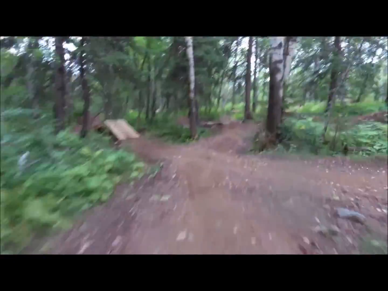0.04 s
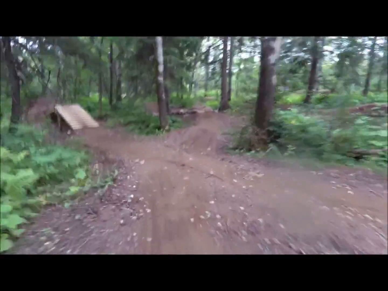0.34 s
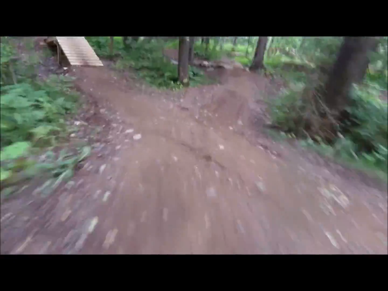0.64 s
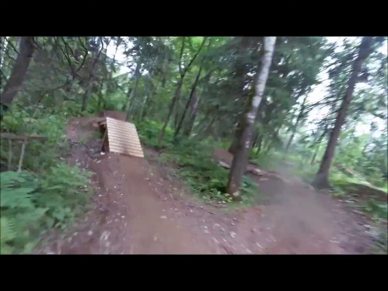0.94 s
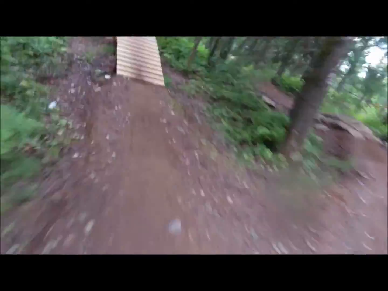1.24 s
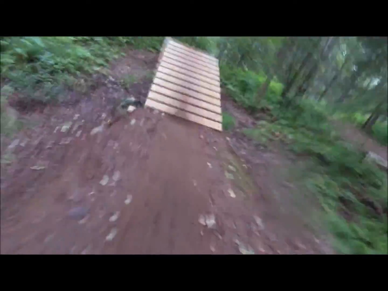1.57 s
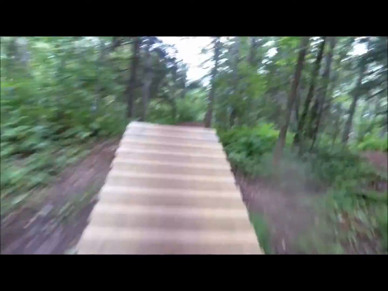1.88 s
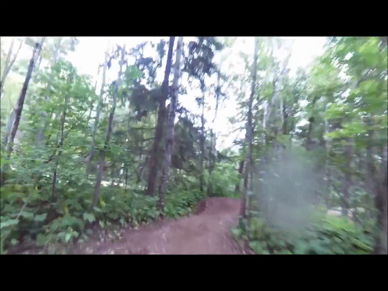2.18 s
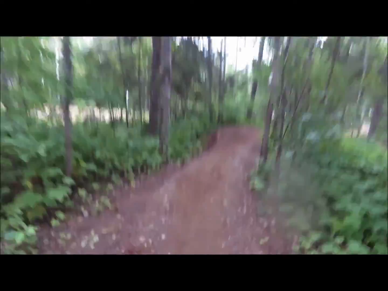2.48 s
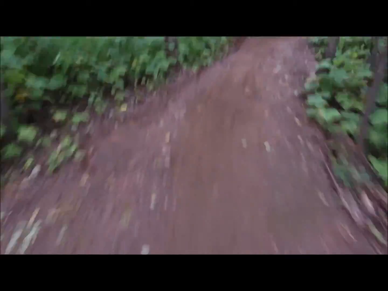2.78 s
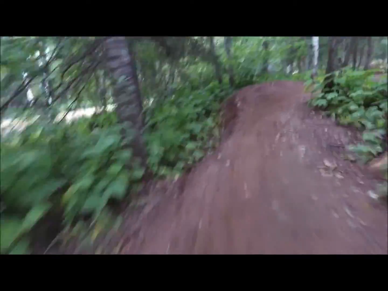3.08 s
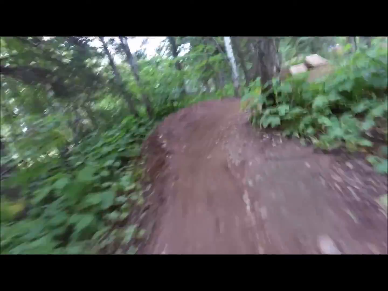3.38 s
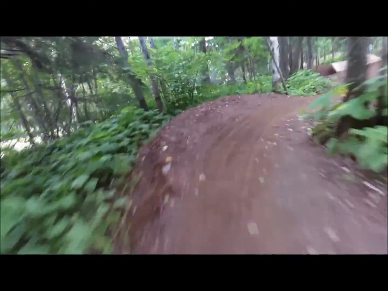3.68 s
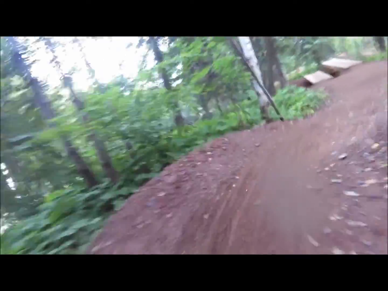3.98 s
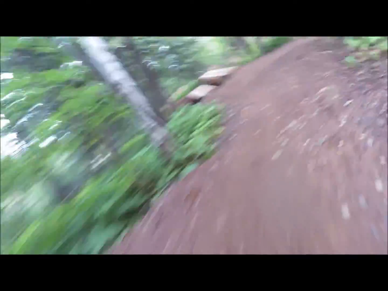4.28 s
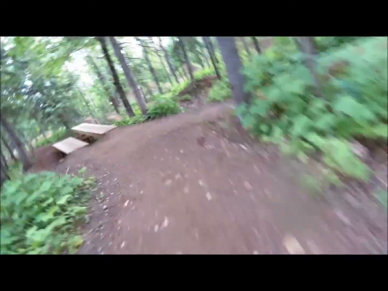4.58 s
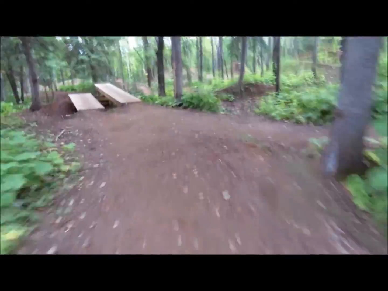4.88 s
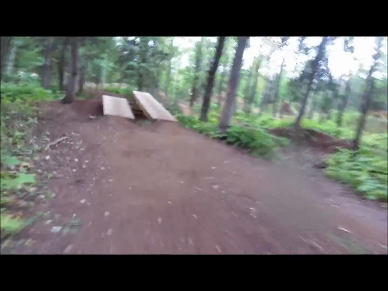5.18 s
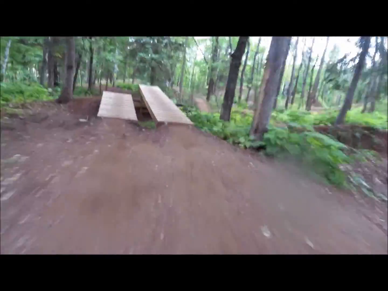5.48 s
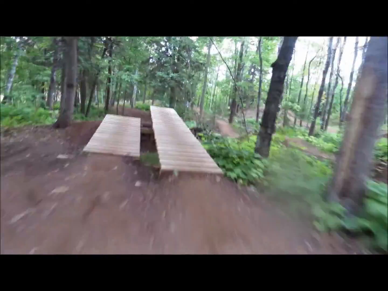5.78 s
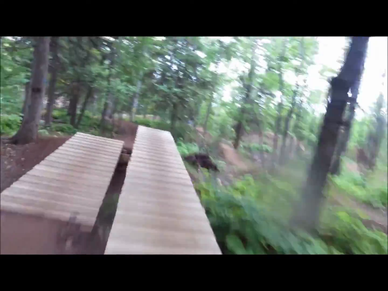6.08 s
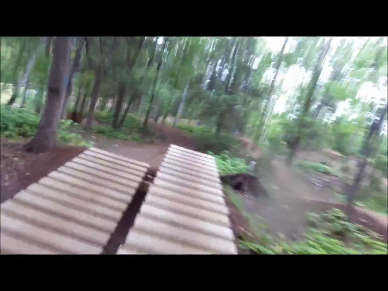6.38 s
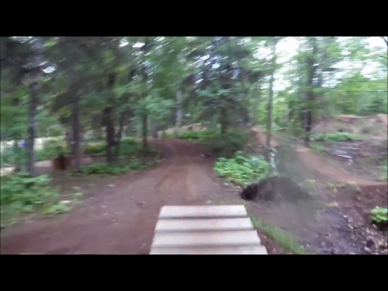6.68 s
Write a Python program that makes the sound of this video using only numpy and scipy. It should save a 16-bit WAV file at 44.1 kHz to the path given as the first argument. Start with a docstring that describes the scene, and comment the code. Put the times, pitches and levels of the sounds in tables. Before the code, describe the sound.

A mountain bike rolls along a dirt forest trail, heard close from the rider's camera. Low wind rumble and a hollow hum run under tyre hiss, crackling grit, irregular thuds and chain clacks. The wheels drum briefly over a wooden ramp, the rattling eases in the air, and the bike lands with a loud, slightly distorted clatter. Bumpy riding continues, with another burst of knocks on wooden boards near the end.

```python
"""On a dirt trail, a mountain bike jumps off a wooden ramp and lands, heard from the rider's camera.
Bumps excite the camera case by impact and briefly overload the microphone; landings shake the mount
and clip the recorder. Chain and pebbles ring the frame's resonances. Rolling contact makes the tyres
hiss, with more chatter and grit on rough ground. Turbulent wind rumbles round the case and hums in
its cavity."""
import sys
import numpy as np
from scipy import signal
from scipy.fft import rfft, irfft, next_fast_len
from scipy.io import wavfile
from scipy.ndimage import map_coordinates

SR = 44100
rng = np.random.default_rng(int(sys.argv[2]) if len(sys.argv) > 2 else 0)


def store_pcm(level_fs):
    """Save levels as 16-bit WAV."""
    pcm = np.round(np.clip(level_fs, -1, 1) * 32767).astype(np.int16)
    wavfile.write(sys.argv[1], SR, np.atleast_2d(pcm).T)


N = 301644


# the hardest bumps, in relative levels: start_s, thud_db, knock_db, edge_db
BUMPS = [(.2231, -8.5, -4.5, -28), (.2795, -5, -1.5, -20.5), (.3175, 3, -9, -50), (.7641, -1.5, -9, -29.5),
         (.9151, 0, -10, -41.5), (.9445, -10, -8.5, -48.5), (.978, -4, -6, -43), (1.2283, -1, 2, -17.5),
         (1.2463, 12.5, 1.5, -17.5), (1.2711, 4, -5.5, -16.5), (1.3487, -1, -27, -20),
         (1.3935, 0.5, -7, -39), (1.4238, -6.5, -7.5, -38.5), (1.5179, 7, -3, -37.5),
         (1.5433, 7, -9, -29.5), (1.5565, 2, -8.5, -32), (1.6353, 2, -11, -36), (1.6662, 7.5, -16, -35.5),
         (1.6945, 0, -10, -24.5), (1.7038, -4, 2.5, -36.5), (1.7421, -4, -2.5, -32), (1.7853, 6, -5, -34),
         (2.0792, -9, 2.5, -27.5), (2.1519, 4.5, -16, -43), (2.2018, -1, -8.5, -56),
         (2.2527, 5, -9.5, -37.5), (2.283, 5.5, -12, -28.5), (2.8628, 1.5, -2, -26),
         (2.8751, 11, 3.5, -22.5), (2.9502, 12, -0.5, -24), (2.9898, 6.5, -7, -24.5),
         (3.0483, 2, -7.5, -27.5), (3.0982, -11, -2, -28.5), (3.1506, 8, -16, -35.5),
         (3.1934, 0.5, -14.5, -33), (3.5397, 11.5, -9.5, -25.5), (3.5549, -1.5, -3.5, -49),
         (3.6555, -7.5, 0.5, -27), (3.6672, 7.5, -10, -25.5), (3.7171, -12, -4.5, -37),
         (3.7299, 5, -2, -29.5), (3.8454, 4.5, .5, -36), (3.9951, -10.5, -5.5, -28.5), (4.0538, 0, -5, -49),
         (4.1015, 1, 0.5, -34), (4.1394, 5.5, -1, -25), (4.1957, 7, -16.5, -34), (4.2567, 0.5, -1.5, -33),
         (4.3193, 1, -12, -44.5), (4.4174, -9.5, -5.5, -34), (4.459, -0.5, -10.5, -36),
         (4.5652, 0, -0.5, -38), (4.5801, -3, -6.5, -44), (4.9349, -6.5, -8, -52), (4.9573, -8.5, -8, -28),
         (4.969, -6, -6.5, -42), (4.9847, -1, -3.5, -28), (5.0147, 6, -4.5, -39), (5.0885, 2.5, -8, -35.5),
         (5.1109, 2.5, -0.5, -26), (5.1509, -9, -5.5, -35.5), (5.1761, 8, -15, -27), (5.2126, 4, -17, -30),
         (5.2285, -4, -13, -25), (5.2509, -1.5, -9, -35.5), (5.2719, -11, -5.5, -55.5),
         (5.3881, 6.5, -13, -34.5), (5.5064, -5.5, -3, -33), (5.53, 3.5, -2, -47.5),
         (5.6462, 8, -7.5, -28.5), (5.6946, -0.5, -10.5, -61), (5.7233, -3.5, -6.5, -58),
         (6.0424, -16, -2.5, -36.5), (6.0852, -3, -4.5, -40.5), (6.2658, 5, -4.5, -16),
         (6.2987, 4, -1, -28), (6.3159, 0.5, -10, -26), (6.3574, 9, -12, -29), (6.371, 5.5, -8, -30),
         (6.457, 1, -7, -28), (6.4823, 9, -24, -31.5), (6.5242, 1, -15, -31), (6.6255, -4.5, -10, -42),
         (6.7212, -2, -8, -43.5), (6.7995, -4.5, -2, -28)]
# frequency response of the struck case: frequency_hz, level_db
CASE_RESPONSE = [(20, -36), (65, 1.5), (150, 4.5), (300, 5.5), (450, 4.5), (700, -1.5), (1000, 0.5),
                 (1400, -2.5), (2800, 0), (4000, -9.5), (5500, -30), (8000, -35.5), (15000, -44.5)]
def case_knocks(rebound_hz=340, uneven_db=5.0, modes=22, max_blows=400):
    """Impact excitation: each bump throws the case against its mount, in alternating directions."""
    track, mode_hz = np.zeros(N), np.geomspace(600, 9000, modes)
    mode_scatter = rng.standard_normal((max_blows, modes))
    rebound_scatter = rng.standard_normal(max_blows)
    for k, (s, thud_db, knock_db, edge_db) in enumerate(BUMPS + ramp_slats() + small_bumps()):
        blow = [(150, thud_db - 3.0), (700, knock_db), (2800, edge_db)]
        # every blow lands elsewhere and rings other resonances of the bike
        ringing = np.c_[mode_hz, uneven_db * mode_scatter[k] * signal.windows.tukey(modes, .2)]
        colour = lambda hz: along(CASE_RESPONSE, hz) + along(blow, hz) + along(ringing, hz) + 33
        add(track, s, (-1) ** k * pulse(colour, rebound_hz * np.exp(0.54 * rebound_scatter[k])))
    return track


def ramp_slats(start_s=2.0847, gap_s=.0208, wheel_lag_s=.0125, levels_db=(5, -6.5, -26.5)):
    """Periodic impacts: both wheels drum over three evenly spaced boards. Rows as in BUMPS."""
    return [(start_s + k * gap_s + lag, *levels_db) for k in range(3) for lag in (0, wheel_lag_s)]


def small_bumps(levels_db=(-3.5, -11.5, -46), scatter_db=2.5):
    """Random impacts: roots and ruts strike only on rough stretches. Rows as in BUMPS."""
    return [(s, *(np.array(levels_db) + ground_db + scatter_db * deviation[:3]))
            for s, ground_db, deviation in chance_events(per_second=17) if ground_db > SMOOTH_DB + 2]


# landings and hard compressions, in relative levels: start_s, length_s, shudder_db, pitch_hz, clatter_db
HEAVY_LOADS = [(1.226, .057, -10.5, 220, -10.5), (1.335, .019, -4, 280.7, -7.5),
               (1.763, .016, -29.5, 404, -13.5), (2.86, .026, -6.5, 242, -6.5),
               (2.88, 0.095, -10.5, 326.2, -22.5), (4.879, .034, -12, 273, -29.5),
               (6.263, 0.011, -6, 338, -4.5), (6.811, .025, -16, 301, -15.5)]
def landings():
    """Shock excitation: the mount shudders at an unsteady pitch while the whole bike clatters."""
    track, waver, clatter = np.zeros(N), wobble(350), coloured_noise(RATTLE_SPECTRUM)
    for s, length_s, shudder_db, pitch_hz, clatter_db in HEAVY_LOADS:
        span = slice(int(s * SR), int((s + length_s) * SR))
        phase = 2 * np.pi * np.cumsum(pitch_hz * np.exp(.3 * waver[span])) / SR
        shake = amp(shudder_db + 5.5) * np.sin(phase) + amp(clatter_db - 0.5) * clatter[span]
        add(track, s, signal.windows.tukey(len(shake), .2) * shake)
    return track


# the loudest chain and pebble strikes, in relative levels:
# start_s, clack_db, clack_hz, tick_db, tick_hz, ping_db
STRIKES = [(0.2214, -34, 1065, -20.5, 3040, -47), (0.5345, -26, 1210, -31, 3300, -70),
           (0.559, -26, 1180, -37, 3320, -62), (0.657, -30, 1230, -32.5, 2980, -56),
           (.729, -24, 1500, -27, 3270, -49), (1.269, -19, 1165, -23, 3100, -32),
           (1.6365, -39, 1010, -28, 3480, -52), (1.768, -20, 1200, -34.5, 3630, -56),
           (1.846, -22, 1670, -26.5, 3660, -57), (1.869, -22, 990, -32, 3230, -55),
           (1.921, -29, 1750, -33.5, 3570, -68), (2.348, -12.5, 1390, -36, 2400, -54),
           (2.4301, -19, 1100, -20, 2480, -33), (2.4735, -20.5, 1383, -21.5, 2570, -25.5),
           (2.9088, -11, 1422, -24.5, 3520, -57), (2.958, -20, 1360, -21, 2580, -46),
           (3.0236, -35, 1070, -26.5, 3400, -53), (3.094, -22, 1130, -21, 2650, -57),
           (3.1056, -16, 1053, -29, 2880, -44), (3.2304, -8, 1393, -28, 3240, -41),
           (3.26, -12.5, 1130, -49, 3207, -55), (3.5857, -41, 1860, -32.5, 3163, -48),
           (3.747, -29, 1380, -33.5, 2970, -37.5), (4.1059, -25, 931, -28, 3400, -56),
           (4.1765, -17.5, 1330, -31.5, 3504, -62), (4.4158, -19, 1670, -34, 3630, -71),
           (4.5427, -21, 1590, -35.5, 3620, -46), (4.957, -21, 1462, -32, 3610, -47),
           (5.243, -22, 1200, -29.5, 3400, -58), (5.3123, -30, 1920, -26.5, 2850, -61),
           (5.4298, -22, 1270, -30, 2520, -49), (6.3077, -18, 970, -28.5, 3250, -58),
           (6.566, -18.5, 1276, -38, 3170, -57), (6.644, -17.5, 1500, -22, 3330, -35),
           (6.726, -26, 1250, -35, 2664, -62)]
def frame_strikes(t60_s=0.011, attack_s=0.0092, ping_hz=5030, size=1024):
    """Modal ringing: chain and pebbles scrape the frame, exciting a clack, a tick and a faint ping."""
    track, t = np.zeros(N), np.arange(size) / SR
    for s, clack_db, clack_hz, tick_db, tick_hz, ping_db in STRIKES + small_strikes():
        def colour(hz):
            clack = amp(clack_db + 41.0) * resonance(hz, clack_hz, skirt_db=22.5)
            tick = amp(tick_db + 39.0) * resonance(hz, tick_hz, skirt_db=46.0)
            ping = amp(ping_db + 28.5) * resonance(hz, ping_hz, skirt_db=41.0)
            return decibels(clack / (1 + (hz / 2600) ** 6) + tick + ping)
        ring = pulse(colour, rebound_hz=tick_hz)
        scrape = rng.standard_normal(size) * amp(-60 * t / t60_s) * (1 - np.exp(-t / attack_s)) ** 2
        strike = signal.fftconvolve(scrape, ring)
        # the scrape spreads the blow in time without changing its energy
        add(track, s, strike * np.linalg.norm(ring) / np.linalg.norm(strike))
    return track


def small_strikes(scatter_db=2.5, scatter_octaves=.2):
    """Random impacts: chain and pebbles hit all along, harder on rough ground. Rows as in STRIKES."""
    rows = []
    for s, ground_db, deviation in chance_events(per_second=16):
        force_db = ground_db + scatter_db * deviation[:3]
        clack_db, tick_db, ping_db = np.array([-28.5, -38, -67]) + force_db
        clack_hz, tick_hz = np.array([1300, 3100]) * 2 ** (scatter_octaves * deviation[3:])
        rows.append((s, clack_db, clack_hz, tick_db, tick_hz, ping_db))
    return rows


# spectrum of the chattering mount: frequency_hz, level_db
RATTLE_SPECTRUM = [(25, -54.5), (60, 6), (200, -7), (450, 7), (750, -1.5), (1100, -9), (1800, -12),
                   (3500, -35), (5500, -50), (8000, -79), (14000, -115)]
def mount_rattle(level_db=-25.5):
    """Shot noise: small stones and ruts keep the mount chattering, more on rough ground."""
    knock = pulse(lambda hz: along(RATTLE_SPECTRUM, hz), rebound_hz=600)
    chatter = signal.fftconvolve(contacts(per_second=130, spread_db=5.0), knock)[:N]
    return amp(level_db + .95 * roughness() + 0.32 * tyre_load()) * unit(chatter)


# spectrum of tyres on dirt: frequency_hz, level_db
TYRE_SPECTRUM = [(250, 12), (450, 3.5), (620, -7), (850, -12), (1130, 13), (1350, -2), (1520, -2),
                 (1900, -20.5), (2650, -10), (2900, -54.5), (3400, -16), (4100, -37.5), (6500, -65.5),
                 (16000, -105)]
def tyre_hiss():
    """Rolling noise: the tread hisses on the dirt, joined by faint whistles."""
    return coloured_noise(TYRE_SPECTRUM) + amp(-1) * whistles()


TAKE_OFF_S, FALL_S, TOUCHDOWN_S = 2.29, 2.56, 2.87
def hiss_envelope(level_db=-33, rough_change_db=-4, drift_db=3, flutter_db=4.0):
    """Amplitude modulation: the hiss flutters with the ground, dips at take-off, swells in the fall."""
    airborne = within(TAKE_OFF_S, TOUCHDOWN_S)
    jump_db = -3.5 * airborne + 9 * within(FALL_S, TOUCHDOWN_S)
    ground_db = rough_change_db * (1 - roughness() / SMOOTH_DB) + tyre_load()
    unsteady_db = (1 - .6 * airborne) * (drift_db * wobble(8) + flutter_db * wobble(60))
    return amp(level_db + ground_db + jump_db + unsteady_db)


# air whistles and frame resonances: pitch_hz, half_width_hz, level_db
WHISTLE_MODES = [(1325, 42, -7), (1900, 60, -15), (2270, 60, -21), (3070, 70, -28), (5260, 80, -42),
                 (5650, 200, -48)]
def whistles():
    """Resonant filtering: frame and case pick narrow, steady bands out of broadband noise."""
    peaks = lambda hz: sum(amp(db) * unit(lorentzian(hz - pitch_hz, half_width_hz))
                           for pitch_hz, half_width_hz, db in WHISTLE_MODES)
    return filtered(rng.standard_normal(N), peaks)


# sizes of gravel under the tyres: pitch_hz, level_db
STONES = [(1150, -1), (1500, 2), (1850, 0), (2300, -14), (2700, -17.5), (3450, -13.5), (4100, -16.5)]
def gravel(level_db=-42):
    """Granular contact: grit crackles under the tread in clumps, each stone size at its own pitch."""
    crackle = 0
    for pitch_hz, db in STONES:
        click = pulse(lambda hz: decibels(resonance(hz, pitch_hz, skirt_db=62.5)), rebound_hz=pitch_hz)
        clumps = amp(6 * wobble(80))
        clicks = signal.fftconvolve(contacts(per_second=170, spread_db=6.5), click)[:N]
        crackle += amp(db) * clumps * unit(clicks)
    patches = amp(5 * wobble(40))
    return amp(level_db + 1.4 * roughness()) * unit(crackle * patches)


def loose_parts(knocks, t60_s=0.093, level_db=-9, size=2048, count=3):
    """Sympathetic vibration: cables and fittings buzz on after each knock, now one, now another."""
    t, buzz = np.arange(size) / SR, np.zeros(N)
    shake = filtered(knocks, lambda hz: resonance(hz, 1700, skirt_db=5.0))
    for _ in range(count):
        tail = rng.standard_normal(size) * amp(-60 * t / t60_s) * (1 - np.exp(-t / 0.003))
        buzz += wobble(20) * signal.fftconvolve(shake, tail / np.linalg.norm(tail))[:N]
    return amp(level_db) * buzz / np.sqrt(count)


# spectrum of the eddies: frequency_hz, level_db
EDDY_SPECTRUM = [(15, -44.5), (25, -47.5), (35, -30), (50, -15.5), (64, 12), (80, -2.5), (130, -3.5),
                 (210, -0.5), (300, -0.5), (450, -13), (700, -56.5), (1500, -78.5), (4000, -120)]
# their strength, which eases as the bike goes light over a crest: time_s, level_db
EDDY_LEVELS = [(0, -23), (.8, -20), (1.02, -28), (1.28, -16.5), (1.7, -24), (1.92, -34.5), (2.14, -17.5),
               (2.38, -34), (2.56, -17.5), (2.78, -22), (3.1, -21), (3.29, -35.5), (3.5, -24.5),
               (4.55, -21), (4.7, -26.5), (4.88, -21), (5.95, -22), (6.84, -30.5)]
def wind_buffeting(gust_db=2.2):
    """Turbulence: eddies press unevenly on the case and make a low rumble."""
    return amp(curve(EDDY_LEVELS) + gust_db * wobble(25)) * coloured_noise(EDDY_SPECTRUM)


# strength of the hum in the case's cavity: time_s, level_db
CAVITY_LEVELS = [(0, -17), (.92, -15), (1.12, -20.5), (1.44, -16), (1.68, -23.5), (2.37, -17), (2.55, -31),
                 (2.83, -28), (2.91, -8), (3.05, -22), (3.5, -18.5), (4.35, -19), (4.65, -21),
                 (4.82, -15.5), (5.24, -26), (5.92, -15.5), (6.5, -19), (6.84, -17.5)]
def cavity_hum(pitch_hz=296.9, drift_share=.05, half_width_hz=54.8, surge_db=2.5):
    """Cavity resonance: wind blows the hollow of the case, giving a noise band of wandering pitch."""
    level = amp(curve(CAVITY_LEVELS) + surge_db * wobble(16))
    phase = 2 * np.pi * np.cumsum(pitch_hz * (1 + drift_share * wobble(11))) / SR
    band = lambda hz: lorentzian(hz, half_width_hz)
    in_phase, quadrature = (filtered(rng.standard_normal(N), band) for _ in range(2))
    return level * unit(in_phase * np.cos(phase) + quadrature * np.sin(phase))


def microphone_choke(knocks, limit=0.115, hold_s=0.0038, delay_s=0.0038):
    """Overload: a heavy push pins the microphone, lowering its gain for some milliseconds."""
    push = filtered(knocks, lambda hz: 1 / (1 + 1j * hz / 130))
    smoothed_delay = lambda hz: np.exp(-2j * np.pi * hz * delay_s - (hz / 400) ** 2)
    load = filtered(np.abs(push), lambda hz: smoothed_delay(hz) / (1 + 2j * np.pi * hz * hold_s))
    return 1 / (1 + (load / limit) ** 4)


SMOOTH_DB, EASE_S = -7, .04  # roughness between stretches; time to roll into one
# stretches of rough ground: start_s, end_s, roughness_db
ROUGH_GROUND = [(0.744, 1.067, -4), (1.38, 1.796, -0.5), (2.03, 2.256, -1), (2.934, 3.23, 6),
                (3.509, 3.78, 0.5), (3.837, 3.917, 2.5), (4.047, 4.281, 1.5), (4.291, 4.6, -4),
                (4.878, 5.29, -0.5), (5.352, 5.714, -3.5), (6.052, 6.15, -3.5), (6.273, 6.6, 0.5),
                (6.722, 6.852, -1.5)]
def roughness():
    """Surface excitation: roughness of the ground under the wheels in dB, one value per sample."""
    corners, half = [], EASE_S / 2
    for start, end, db in ROUGH_GROUND:
        corners += [(start - half, SMOOTH_DB), (start + half, db)]
        corners += [(end - half, db), (end + half, SMOOTH_DB)]
    return curve(sorted(corners))


# turns and dips: start_s, end_s, gain_db
TURNS_AND_DIPS = [(.72, .93, 4.5), (1.39, 1.52, 4.5), (3.394, 3.55, 5.5), (4.677, 4.95, 6)]
def tyre_load():
    """Contact pressure: gain in dB, per sample, where the tyres press harder into the dirt."""
    return sum(db * within(start, end) for start, end, db in TURNS_AND_DIPS)


def chance_events(per_second, count=300):
    """Jittered timing: one event in each equal slot, as time_s, roughness_db, five random deviations."""
    times = (np.arange(count) + rng.random(count)) / per_second
    deviations = np.clip(rng.standard_normal((count, 5)), -2, 2)
    ground_db = roughness()
    return [(s, ground_db[int(s * SR)], d) for s, d in zip(times, deviations) if s * SR < N]


def contacts(per_second, spread_db, count=3000):
    """Random point process: impulses of either sign, a few much larger than the rest."""
    place, chance, size, sign = rng.random((count, 4)).T
    heard = chance < per_second * N / SR / count
    sizes = heard * np.sign(sign - .5) * amp(spread_db * np.minimum(-np.log(size), 2))
    return np.bincount((place * N).astype(int), sizes, N)


def pulse(colour_db, rebound_hz, size=2048):
    """Causal impulse response: a push of the given spectrum that swings back and dies out."""
    hz = np.fft.rfftfreq(size, 1 / SR)
    cepstrum = irfft(np.log(amp(colour_db(hz)) + 1e-7))
    cepstrum[1:size // 2] *= 2  # folding the cepstrum makes the push causal
    cepstrum[size // 2 + 1:] = 0
    all_pass = (rebound_hz - 1j * hz) / (rebound_hz + 1j * hz)
    return irfft(np.exp(rfft(cepstrum)) * all_pass) * np.hanning(2 * size)[size:]


def resonance(hz, centre_hz, skirt_db):
    """Broad resonance: gain that is skirt_db down an octave from the centre."""
    return amp(-skirt_db * np.abs(np.log2((hz + 1) / centre_hz)) ** 1.2)


def lorentzian(offset_hz, half_width_hz):
    """Resonance line shape: gain that halves at half_width_hz from the centre."""
    return 1 / (1 + (offset_hz / half_width_hz) ** 2)


def coloured_noise(spectrum):
    """Spectral shaping: noise of rms 1 with the given spectrum."""
    return unit(filtered(rng.standard_normal(N), lambda hz: amp(along(spectrum, hz))))


def filtered(x, response):
    """Linear filtering: the spectrum of x times a response of frequency."""
    size = next_fast_len(N + SR // 4)
    return irfft(rfft(x, size) * response(np.fft.rfftfreq(size, 1 / SR)), size)[:N]


def wobble(knots_per_s):
    """Random modulation: a smooth curve with rounded extremes."""
    knots = 2 * np.tanh(rng.standard_normal(4096) / 2)
    at = np.linspace(0, N, 8192)
    return np.interp(np.arange(N), at, map_coordinates(knots, [at * knots_per_s / SR], mode="wrap"))


def within(start_s, end_s):
    """Time window: 1 inside and 0 outside, with sloping edges."""
    t = np.arange(N) / SR
    return np.clip(np.minimum(t - start_s, end_s - t) / EASE_S + .5, 0, 1)


def curve(points):
    """Linear interpolation of (time_s, value) points at every sample."""
    return np.interp(np.arange(N) / SR, *np.transpose(points))


def along(points, hz):
    """Log-frequency interpolation of (frequency_hz, value) points."""
    point_hz, values = np.transpose(points)
    return np.interp(np.log(hz + 1), np.log(point_hz + 1), values)


def add(track, start_s, sound):
    """Superposition: mix a sound into the track."""
    part = track[max(0, round(start_s * SR)):][:len(sound)]
    part += sound[:len(part)]


def amp(db):
    """Decibels to gain."""
    return 10 ** (np.asarray(db) / 20)


def decibels(gain):
    """Gain to decibels."""
    return 20 * np.log10(gain + 1e-7)


def unit(x):
    """Normalisation to rms 1."""
    return x / np.sqrt(np.mean(np.abs(x) ** 2) + 1e-20)


def scene():
    """Superposition at one microphone: knocks choke the rolling and wind; chatter eases at take-off."""
    knocks = case_knocks()
    hiss_gain = hiss_envelope()
    grounded = 1 - 0.49 * within(TAKE_OFF_S, FALL_S)
    wind = wind_buffeting() + cavity_hum()
    rolling = hiss_gain * tyre_hiss() + grounded * (mount_rattle() + gravel()) + loose_parts(knocks)
    impacts = knocks + landings() + frame_strikes()
    return (impacts + microphone_choke(knocks) * (rolling + wind))[None]


def record(dry, hardness=10, low_cut_hz=32, top_hz=15900):
    """Saturation and band limiting: the recorder cuts deep rumble, clips and drops the top treble."""
    passed = filtered(dry[0], lambda hz: 1 / np.sqrt(1 + (low_cut_hz / (hz + 1)) ** 4))
    clipped = passed / (1 + np.abs(passed) ** hardness) ** (1 / hardness)
    return filtered(clipped, lambda hz: hz < top_hz)[None]


dry = scene()
out = record(dry)
store_pcm(out)
```